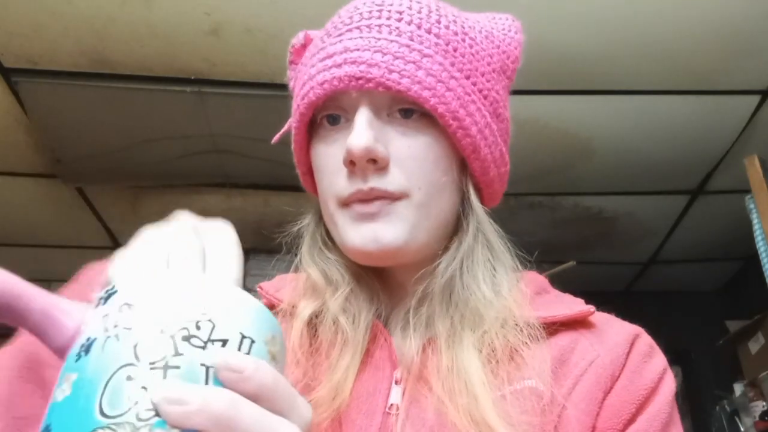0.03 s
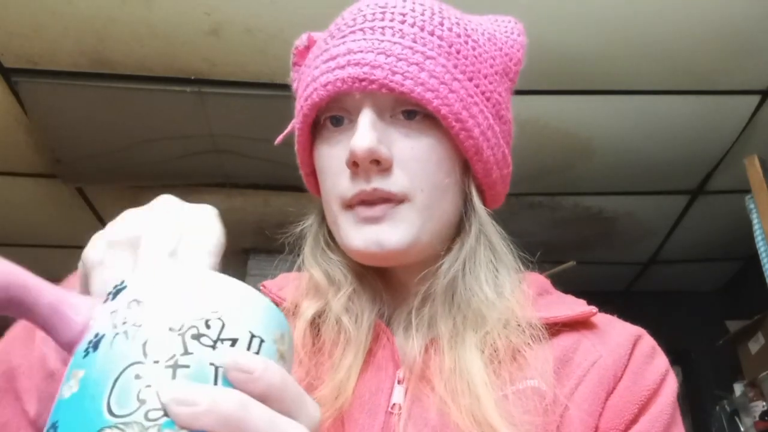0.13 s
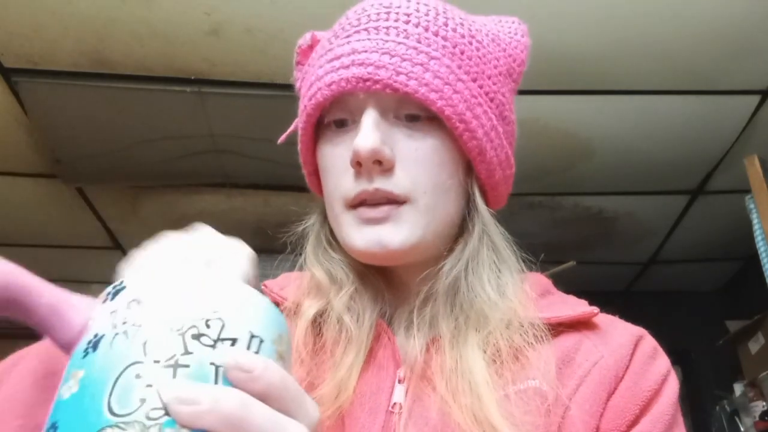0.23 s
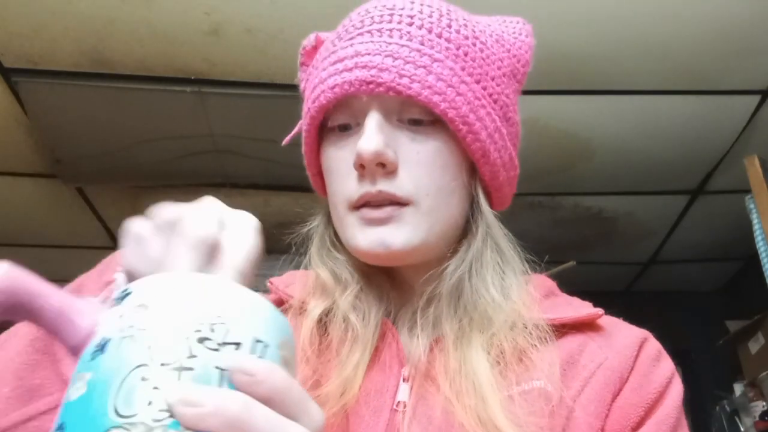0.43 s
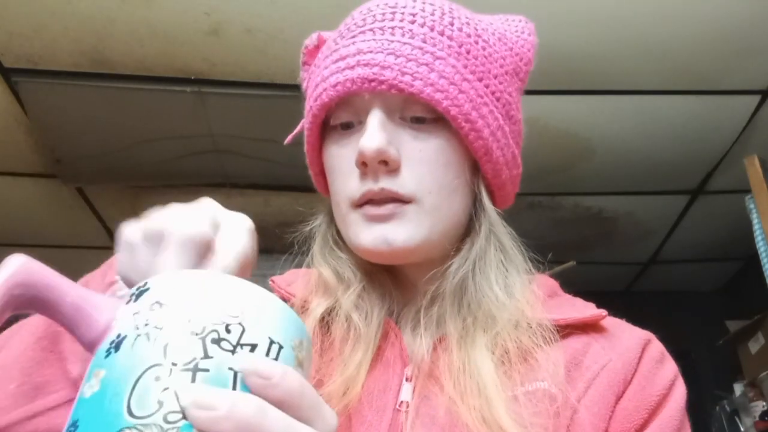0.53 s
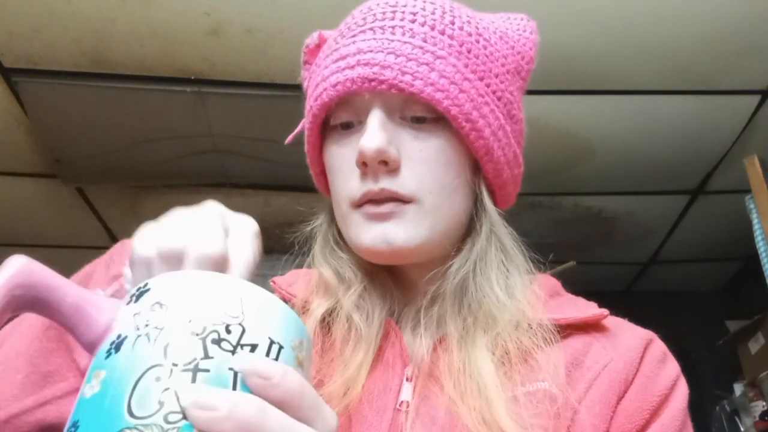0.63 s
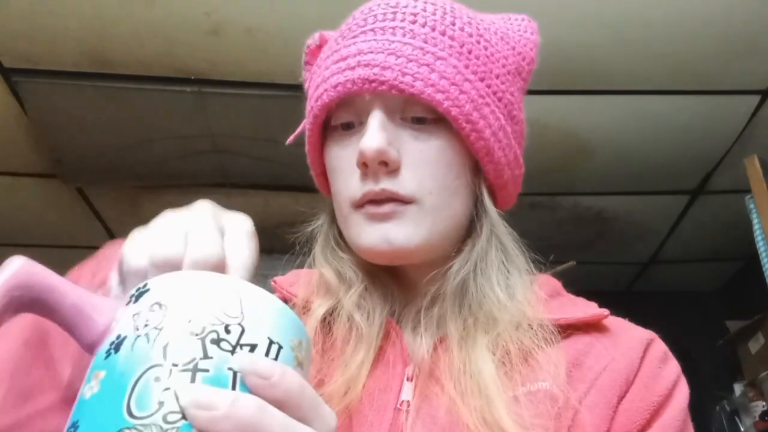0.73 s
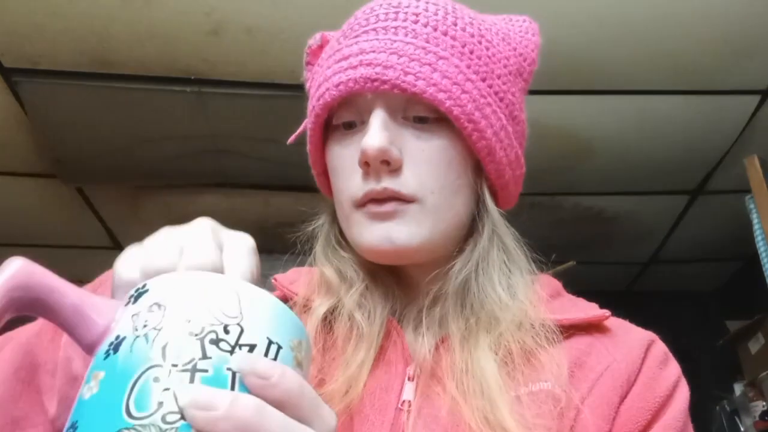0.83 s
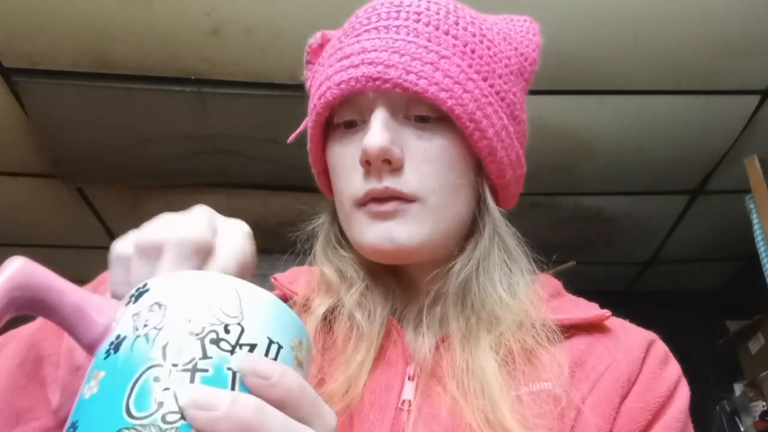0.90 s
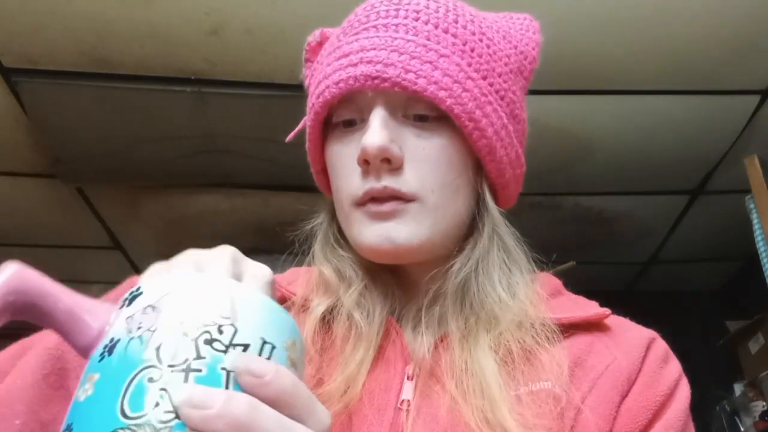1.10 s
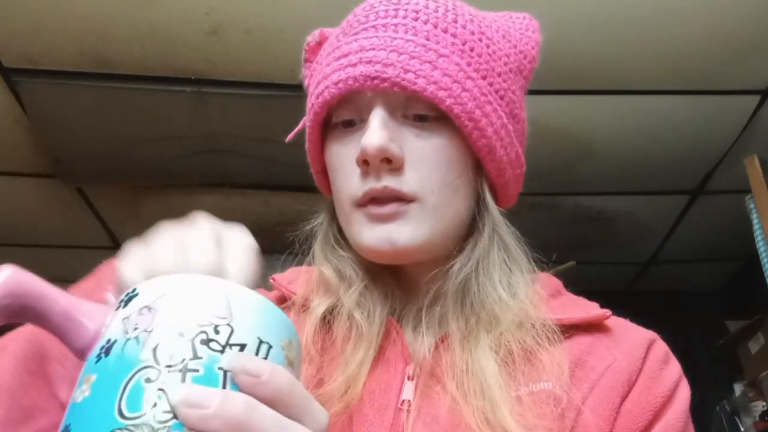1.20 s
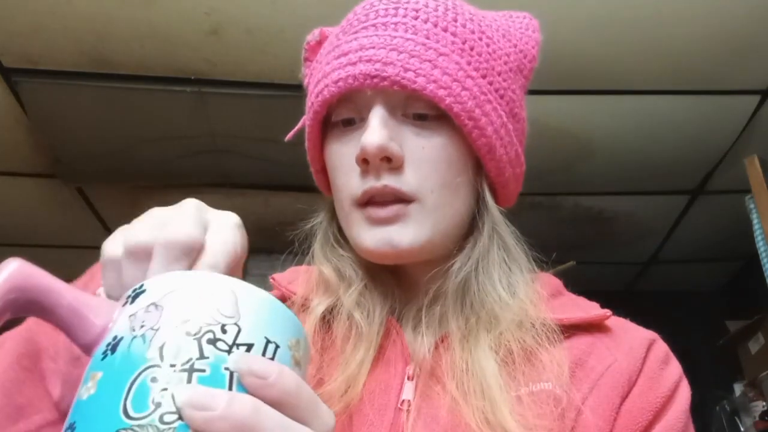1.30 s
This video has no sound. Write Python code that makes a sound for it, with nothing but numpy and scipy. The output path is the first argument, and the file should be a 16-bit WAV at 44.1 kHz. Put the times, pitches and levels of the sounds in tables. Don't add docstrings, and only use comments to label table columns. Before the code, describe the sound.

A metal spoon stirs dry flour in a ceramic mug with quick, irregular clinks up close

```python
import sys
import numpy as np
from scipy import signal
from scipy.fft import rfft, irfft, next_fast_len
from scipy.io import wavfile
from scipy.ndimage import uniform_filter1d

SR = 44100
rng = np.random.default_rng(int(sys.argv[2]) if len(sys.argv) > 2 else 0)


def volts_from_db(level):
    exponent = np.asarray(level, float) / 20
    return 10 ** exponent


def bounce(signal):
    frames = np.transpose(np.atleast_2d(signal))
    limited = np.clip(frames, -1, 1)
    pcm = np.round(limited * 32767).astype(np.int16)
    wavfile.write(sys.argv[1], SR, pcm)


N = 59535

RIM_HZ, BELL_HZ = 1744, 3467
# (frequency [Hz], level [dB])
AIR_SPECTRUM = [(30, -23.5), (100, 4), (224, -4.5), (800, -13.5), (1740, -33.5), (3520, -29.5), (8000, -36),
                (16500, -57)]
# (time [s], level [dB])
DRAG_PRESSURE = [(0, -57.5), (.05, -68), (0.132, -83.5), (0.159, -64), (0.298, -54.5), (0.342, -62),
                 (0.392, -70), (.46, -84), (0.567, -100), (0.608, -38), (0.729, -67), (0.776, -84.5),
                 (.82, -72), (.89, -116), (0.948, -69), (1.098, -81), (1.2, -65.5), (1.35, -107)]
# (frequency [Hz], level [dB])
FLOUR_SPECTRUM = [(700, -21), (2000, -21.5), (3700, -16.5), (5100, -25), (6100, -9.5), (8200, -28),
                  (13300, -16), (14900, -13)]
# (time [s], level [dB], length [s], time to die by 60 dB [s])
DRY_RINGS = [(0.00096, -27, 0.0043, 0.04), (0.019, -30, .004, 0.033), (.044, -34, 0.0028, 0.021),
             (0.15, -36, .0015, 0.0091), (0.2, -35.5, 0.0065, 0.017), (.571, -38, 0.0066, 0.0015),
             (0.57, -18, 0.0093, 0.024), (.576, -19, 0.002, 0.017), (0.579, -44, 0.0044, 0.25),
             (0.52, -56, 0.0065, 0.0049), (.602, -40, 0.0042, 0.23), (0.61, -31, .04, 0.055),
             (0.6, -42, 0.047, 0.039), (.606, -36, .04, .08), (.602, -53, .003, .07),
             (.693, -34.5, .003, .02), (0.81, -38, 0.0087, 0.018), (0.807, -53.5, 0.0042, 0.051),
             (0.912, -52, 0.0056, 0.019), (0.92, -47, .004, 0.0087), (0.951, -49, 0.0036, .012),
             (1.004, -43, 0.0047, 0.013), (0.23, -33.5, 0.0035, 0.24), (1.105, -50, .004, .012),
             (1.11, -62.5, .035, 0.25), (1.201, -56, 0.032, 0.11), (1.172, -56, 0.0056, 0.16),
             (1.175, -48.5, 0.026, 0.028), (1.215, -52, 0.0072, 0.051), (1.235, -55, 0.0037, 0.041),
             (0.014, -43.5, .03, 0.06), (.495, -48.5, 0.0095, .015), (0.961, -49, .006, 0.036),
             (1, -36, 0.01, .03), (1.1, -49.5, 0.0072, 0.034), (.016, -29.5, .03, .006),
             (0.82, -44, 0.0092, .015), (.148, -39, 0.017, 0.0066), (.352, -39.5, 0.018, 0.018)]
DRY_RING_HZ = [600, 1400, 520, 3400, 600, 7500, 3700, 14800, RIM_HZ, 7200, 9184, 15340, 14600, 12850, 4433,
               9650, 8300, 2450, 4200, 5800, 560, 560, RIM_HZ, 3950, 880, BELL_HZ, RIM_HZ, 3750, 480, 6250,
               3600, 6600, 6200, 3690, 3690, 900, 7000, 7300, 1500]
# (level [dB], length [s], time to die by 60 dB [s])
KNOCKS = [(-17, 0.0122, 0.016), (-13, 0.01, 0.0077), (-28.5, .020, 0.034), (-33.5, .012, 0.03),
          (-22, 0.024, 0.0046), (-42.5, .035, 0.16), (-39, .021, 0.0095), (-52, 0.01, 0.043),
          (-40.5, 0.0092, 0.23), (-29.5, 0.00442, 0.024), (-34.5, 0.0088, 0.031), (-24.5, 0.0015, 0.0054),
          (-34, 0.0068, 0.017), (-45.5, 0.0066, 0.013), (-42.5, 0.016, 0.017)]
KNOCK_S = [.015, .0145, .030, .155, .204, .245, .352, .497, .606, .693, .710, .9145, .9145, 1.003, 1.149]
KNOCK_HZ = [640, 1200, 500, 600, 1000, 620, 1450, 580, 610, 640, 650, 280, 625, 300, 1400]
KNOCK_PAN_DB = [0, 4, -9, -6, 4, -0.5, -16, -1, 1, -3, -8, -15.5, 0, -9, -18]
# (level [dB], length [s], time to die by 60 dB [s])
CLINKS = [(-6.5, 0.0009, .01), (-3.5, 0.00036, .0095), (-14.5, 0.0051, 0.1), (-5, .0043, 0.022),
          (-24.5, 0.0039, 0.1), (-14, .002, 0.0055), (-20, 0.002498, 0.011), (-23, .012, 0.0095),
          (-43.5, 0.032, .15), (-20.5, 0.00089, 0.017), (-38, 0.00313, 0.036), (-56, .004, 0.025),
          (-50, 0.0036, .02), (-46.5, 0.0062, 0.0076), (-39.5, 0.0073, .015), (-51.5, .025, 0.015),
          (-44.5, 0.032, 0.013), (-47.5, 0.014, 0.045), (-51.5, 0.0045, .2), (-52.5, 0.04, 0.028)]
CLINK_S = [.2363, .2363, .2363, .602, .604, .3517, .3517, .376, .380, .6925, .8091, .851, .958, .958, .958,
           1.06, 1.105, 1.149, 1.1697, 1.205]
CLINK_HZ = [6510, 14750, BELL_HZ, 6510, 5840, 9000, 6900, 7400, RIM_HZ, 4050, 3690, 7900, 2950, 4300, 9640,
            5900, 5900, 3980, BELL_HZ, 6200]
CLINK_PAN_DB = [20, -1, 2, .4, -3, -7, -1.5, -4, 0, 6, -6.5, 1, 0.5, -22, -13, 3.5, 10.3, 7.9, 2.4, 7]
TAP_S = [.018, .085, .1465, .154, .198, .204, .2362, .296, .3517, .375, .4973, .5757, .599, .602, .6923,
         .717, .8091, .821, .9143, .958, 1.0011, 1.066, 1.2351]
# (spoon level [dB], wall level [dB], chatter length [s], brightness [dB/octave])
TAPS = [(-44.5, -49, 0.013, 6), (-49, -62, 0.02, 0.5), (-36, -72, 0.015, 5), (-46, -66.5, 0.0064, 2),
        (-48.5, -72, 0.01, 12), (-24, -35.5, 0.0051, 2), (-8.5, -23.5, 0.0011, 0.5), (-47, -60, 0.0039, 10),
        (-32, -38.5, 0.0054, 4.5), (-34, -38, 0.014, 6), (-44.5, -61.5, 0.013, 1), (-19.5, -41, 0.0052, 5),
        (-47.5, -42, .003, 15), (-18, -13, 0.0013, 8), (-36, -75, 0.002, 6.5), (-42, -77, 0.0064, 6.5),
        (-50, -61.5, 0.0036, 8.5), (-56, -73, 0.013, 4.3), (-61.5, -70, 0.00096, 9),
        (-61.5, -66, 0.004, 12.5), (-53, -68, 0.001, 3.5), (-62, -63.5, 0.0206, -10.5),
        (-77.5, -75, 0.0011, 13)]
SPOON_HZ = [3685, 3760, 6490, 8290, 9650, 14760, 15180]
# (level [dB], time to die by 60 dB [s], left over right [dB], left leads [rad])
SPOON = [(-15.5, 0.05, -1.5, .55), (0.8, 0.021, -3.5, 0.74), (-5, 0.0067, -9.9, .2),
         (-31.5, 0.0062, -3.5, 0.8), (-24.5, 0.036, -11, .1), (-12.5, 0.021, -3.4, .1), (-50, .02, 1, .2)]
WALL_HZ = [1744, 2445, 3467, 4433, 5330, 5725, 5840, 6205, 6515, 12770]
# (level [dB], time to die by 60 dB [s], left over right [dB], left leads [rad])
WALL = [(-13.5, 0.17, 3.5, -0.4), (-36, 0.05, 0, -1.7), (2.5, 0.12, -2.7, 1.04), (-1.5, 0.036, 7, -1.5),
        (-23, .12, 0.6, -0.5), (-13.5, .06, -10.5, 2), (-1.5, 0.017, -11.5, 0.6), (-21, 0.047, -1.3, 1.2),
        (-8, 0.031, -1.5, 1.2), (-41, 0.12, -1, -0.5)]
# (frequency [Hz], level [dB per Hz])
SPLASH_SPECTRUM = [(900, -11), (2600, 1), (3700, -2.5), (5150, -15.5), (6500, -2), (8000, -13),
                   (13300, -18), (14900, -17.5)]


def rms_one(x):
    return x / np.sqrt(np.mean(x ** 2) + 1e-20)


def drift(rate):
    r = np.exp(-80 * np.pi * rate / SR)
    chance = rng.standard_normal(N // 40 + 2002)
    slow = signal.lfilter([1], [1, -2 * r, r * r], chance)[2000:]
    return np.interp(np.arange(N) / 40, np.arange(len(slow)), rms_one(slow))


def mains_hum():
    level = np.sqrt(2) * volts_from_db(-62.5 + 1.5 * drift(16))
    return level * np.sin(2 * np.pi * 120 * np.arange(N) / SR + 0.59)


def colour(x, points):
    size = next_fast_len(2 * N)
    hz, db = np.transpose(points)
    bins_hz = np.arange(size // 2 + 1) * SR / size
    log_gain = np.interp(np.log(bins_hz + 1), np.log(hz), db) * np.log(10) / 20
    cepstrum = irfft(log_gain, size)
    cepstrum[1:size // 2] *= 2
    cepstrum[size // 2 + 1:] = 0
    return irfft(rfft(x, size) * np.exp(rfft(cepstrum)), size)[..., :N]


def pair():
    alike = 0.72
    mid, side = rng.standard_normal((2, N))
    return np.sqrt(1 + alike) * mid + np.sqrt(1 - alike) * side * np.array([[1], [-1]])


def room_air():
    return volts_from_db(-67 + 1.5 * drift(15)) * rms_one(colour(pair(), AIR_SPECTRUM))


def drag():
    s, db = np.transpose(DRAG_PRESSURE)
    return volts_from_db(np.interp(np.arange(N) / SR, s, db) + 2.0 * drift(87))


def flour():
    hiss = rms_one(colour(pair(), FLOUR_SPECTRUM))
    pressure = volts_from_db(8.5) * drag()
    edges_hz = np.linspace(400, 17000, 29)
    patchy = 0
    for edge in zip(edges_hz, edges_hz[1:]):
        band = signal.sosfilt(signal.butter(2, edge, "band", fs=SR, output="sos"), hiss)
        patchy = patchy + volts_from_db(3.5 * drift(5)) * band
    return pressure * patchy


def chatter(starts, lengths):
    shape = (len(starts), 2048)
    grit = rng.standard_normal(shape)
    blow_db = 10.5 * np.minimum(rng.exponential(1, shape), 4)
    t = np.arange(2048) / SR
    past_end = np.maximum(t - np.clip(lengths, 0, .04)[:, None], 0)
    swell = np.exp(-past_end / 0.0001) * np.minimum(t / 0.000091, 1)
    burst = grit * volts_from_db(blow_db) * swell
    where = (starts * SR).astype(int)[:, None] + np.arange(2048)
    return where, burst / np.sqrt((burst ** 2).sum(1, keepdims=True))


def even(burst, hz):
    turn = 2 * np.pi * hz / SR * np.arange(burst.shape[-1])
    wander = 0.16 * min(hz / 3000, 1) * np.cumsum(np.sign(burst), -1)
    push = np.abs(burst) * np.cos(turn + wander)
    strength = np.abs(push @ np.exp(-1j * turn)) + np.abs(burst).sum(-1) / 10
    return push / strength[..., None]


def lay(where, bursts):
    return np.bincount(where.ravel(), bursts.ravel(), N + 4096)[:N]


def ring(clicks, hz, t60, pan_db, lead):
    pole = volts_from_db(-60 / (t60 * SR)) * np.exp(2j * np.pi * hz / SR)
    z = signal.lfilter([1], [1, -pole], clicks + 1e-18)
    side = np.array([[.5], [-.5]])
    return volts_from_db(pan_db * side) * np.imag(z * np.exp(1j * lead * side))


def pushes(starts, pitches, rows, pans_db, leads):
    db, length, t60 = rows
    where, burst = chatter(np.array(starts), length)
    out = 0
    for k, hz in enumerate(pitches):
        push = lay(where[k], even(burst[k], hz) * volts_from_db(db[k]))
        out = out + ring(push, hz, t60[k], pans_db[k], leads[k])
    return out


def dry_rings():
    s, *rows = np.transpose(DRY_RINGS)
    return pushes(s, DRY_RING_HZ, rows, 0 * s, 0.14 + 0 * s)


def high_pass(x, order, hz):
    return signal.sosfilt(signal.butter(order, hz, "high", fs=SR, output="sos"), x)


def knocks_and_clinks():
    rows = np.transpose(KNOCKS + CLINKS)
    pans_db = KNOCK_PAN_DB + CLINK_PAN_DB
    leads = [0.49] * len(KNOCKS) + [0.12] * len(CLINKS)
    return high_pass(pushes(KNOCK_S + CLINK_S, KNOCK_HZ + CLINK_HZ, rows, pans_db, leads), 2, 130)


def splash(where, burst, db, tilt):
    t = np.arange(SR // 4) / SR
    fade = volts_from_db(-60 * t / 0.041) + volts_from_db(-55.5 - 60 * t / 0.075)
    body = pair()[:, :len(t)] * fade
    body = body / np.sqrt((body ** 2).sum(1, keepdims=True))
    hits = 0
    for half, octaves_up in (("low", 0), ("high", 2)):
        split = signal.butter(2, 4240, half, fs=SR, output="sos")
        gain = volts_from_db(db + octaves_up * tilt)[:, None]
        hits = hits + signal.sosfilt(split, lay(where, burst * gain))
    return colour(signal.fftconvolve(hits[None], body)[:, :N], SPLASH_SPECTRUM)


def taps():
    starts = np.array(TAP_S)
    spoon_db, wall_db, length, tilt = np.transpose(TAPS)
    where, burst = chatter(starts, length)
    out = splash(where, burst, spoon_db + 23, tilt)
    rub = volts_from_db(-28.5) * drag() * rng.standard_normal(N)
    for pitches, modes, db in ((SPOON_HZ, SPOON, spoon_db), (WALL_HZ, WALL, wall_db)):
        luck_db = 5 * rng.standard_normal((len(starts), len(modes)))
        for k, (hz, (mode_db, t60, pan_db, lead)) in enumerate(zip(pitches, modes)):
            gain = volts_from_db(db + tilt * np.log2(hz / 3600) + luck_db[:, k])
            strikes = lay(where, even(burst, hz) * gain[:, None])
            out = out + ring(volts_from_db(mode_db) * (strikes + rub), hz, t60, pan_db, lead)
    return high_pass(out, 3, 678)


def room(x):
    t = np.arange(SR // 3) / SR
    t60 = 0.098
    noise = rng.standard_normal((2, len(t))) * volts_from_db(-60 * t / t60) * (t > .003)
    r = np.exp(-2 * np.pi * 3700 / SR)
    tail = signal.lfilter([1 - r], [1, -r], noise)
    tail = tail / np.sqrt((tail ** 2).sum(1, keepdims=True))
    return signal.fftconvolve(x.mean(0)[None], tail)[:, :N]


def outside(start, length):
    return np.abs(np.arange(N) / SR - start - length / 2) - length / 2


def scene():
    mug = taps() + knocks_and_clinks()
    dip = volts_from_db(-22 * np.clip(-outside(.5865, .006) / .0015, 0, 1))
    stir = (mug + volts_from_db(-9) * room(mug) + flour()) * dip
    return stir + mains_hum() + room_air() + dry_rings()


def roll_off(x):
    return signal.sosfilt(signal.butter(12, 16970, fs=SR, output="sos"), x)


def record(dry):
    t = np.arange(N) / SR
    level_db = 10 * np.log10(uniform_filter1d((dry ** 2).mean(0), 128) + 1e-12)
    release = 294 * t
    held_db = np.maximum.accumulate(level_db + release) - release
    duck_db = -0.2 * np.maximum(held_db + 39, 0)
    duck = volts_from_db(signal.lfilter(np.ones(400) / 400, 1, duck_db))
    silence = np.clip(outside(.1935, .0035) / 0.0013, .01, 1)
    ceiling = .85
    rounded = ceiling * np.tanh(dry * duck * silence / ceiling)
    mix = signal.sosfilt(signal.cheby1(8, 1, 15550, fs=SR, output="sos"), rounded)
    return roll_off(mix)


dry = scene()
out = record(dry)
bounce(out)
```